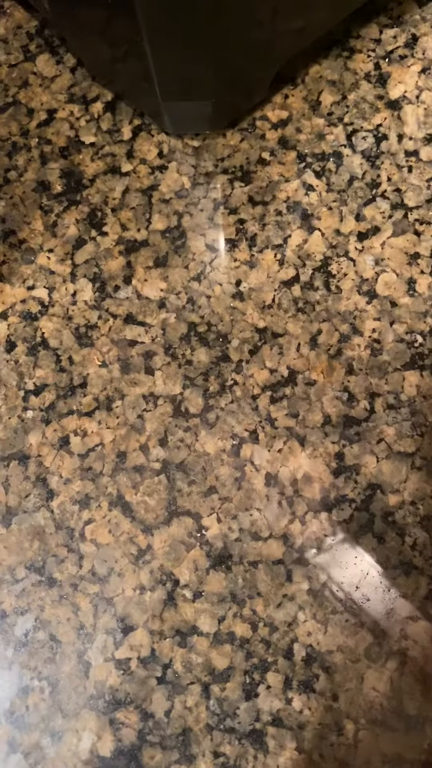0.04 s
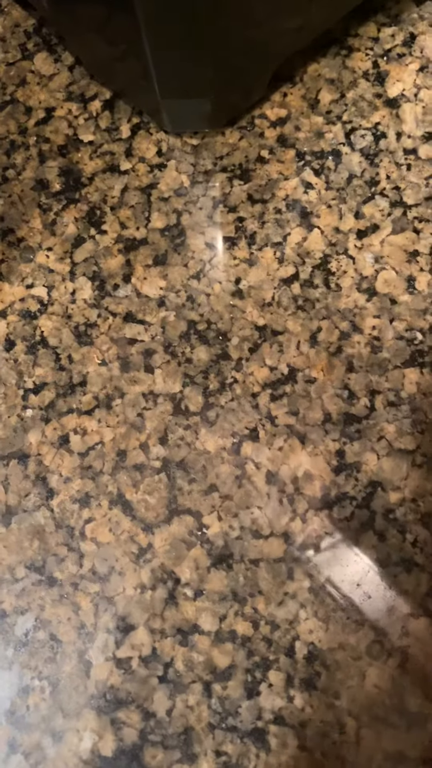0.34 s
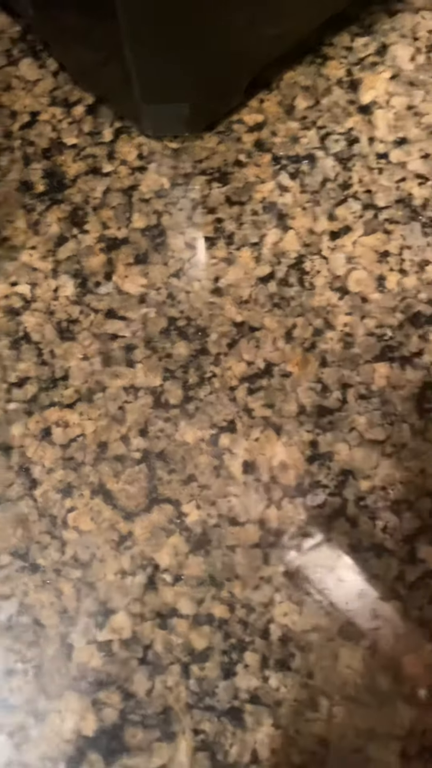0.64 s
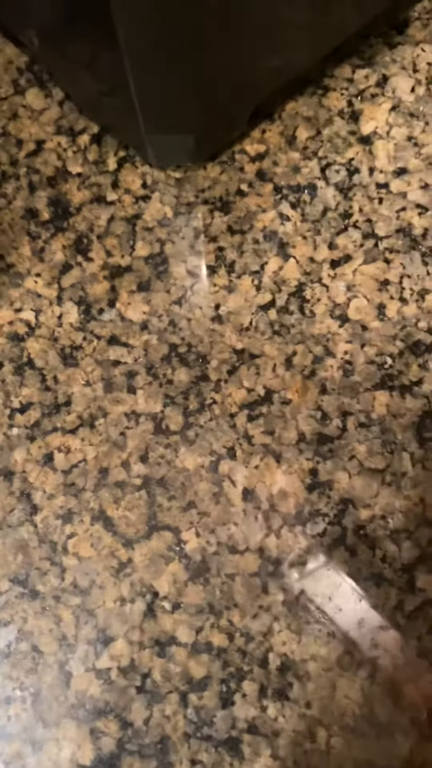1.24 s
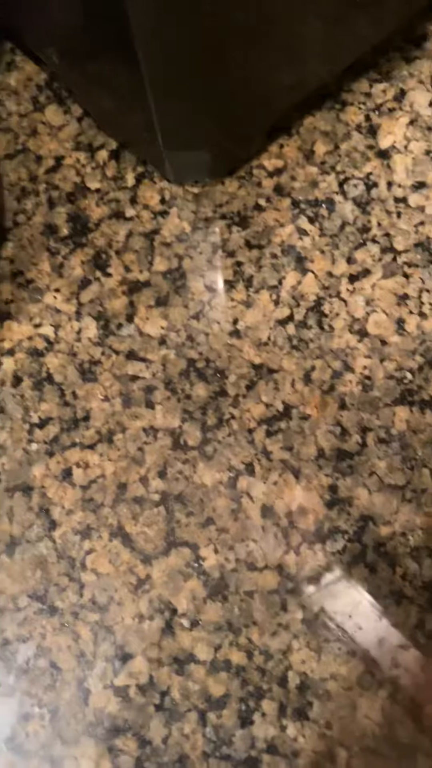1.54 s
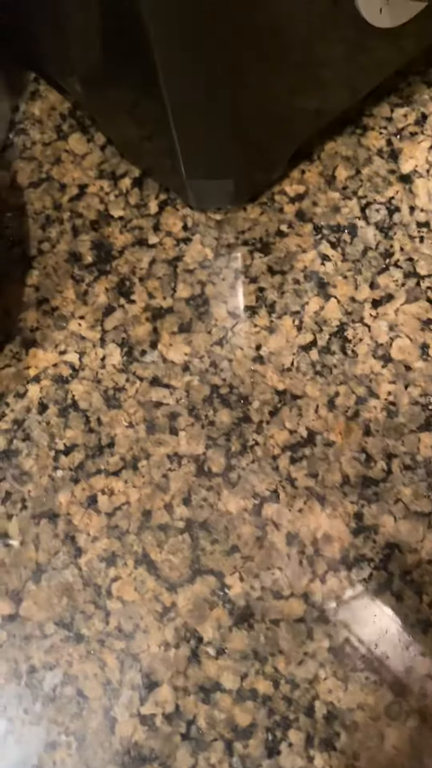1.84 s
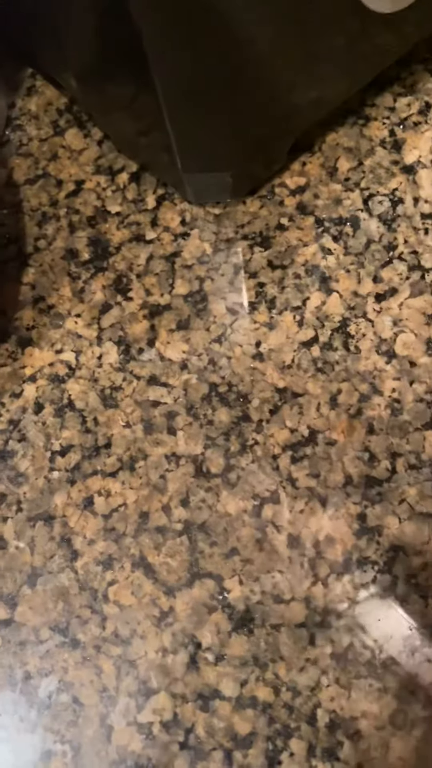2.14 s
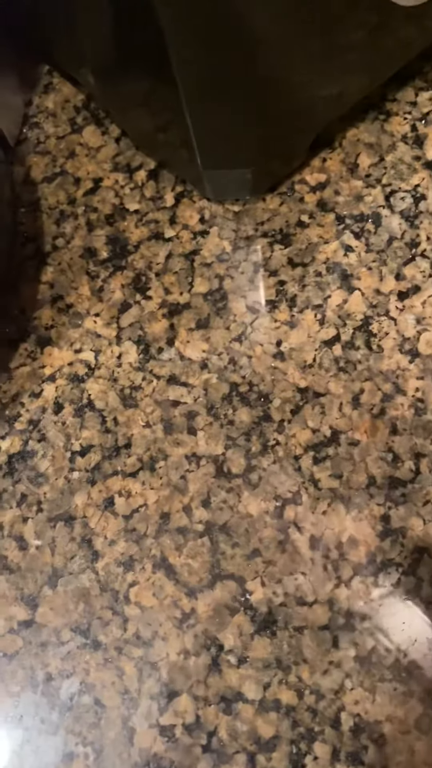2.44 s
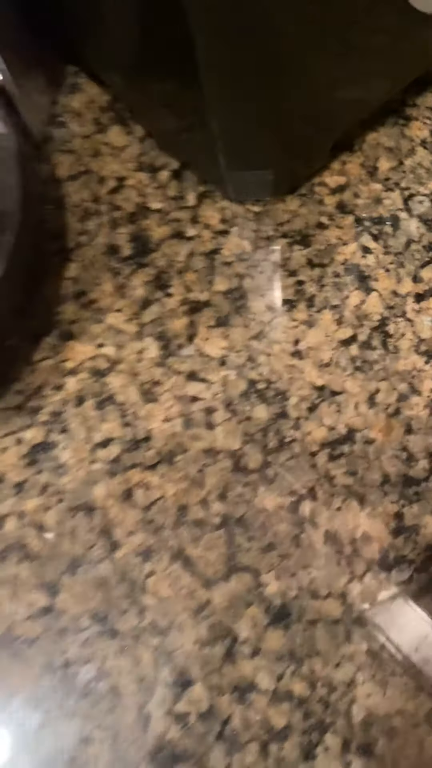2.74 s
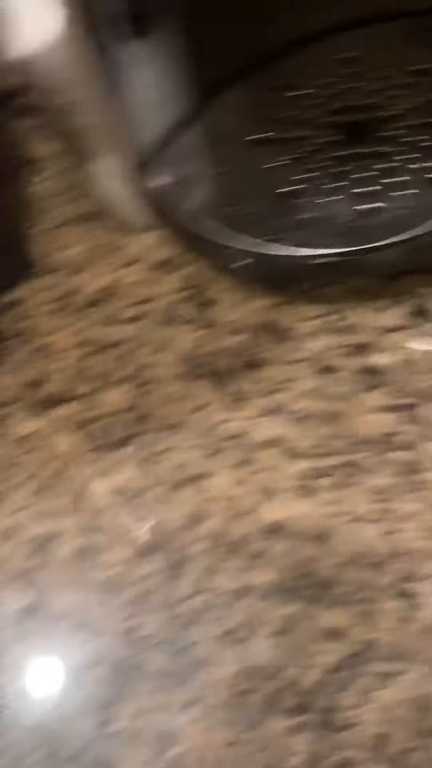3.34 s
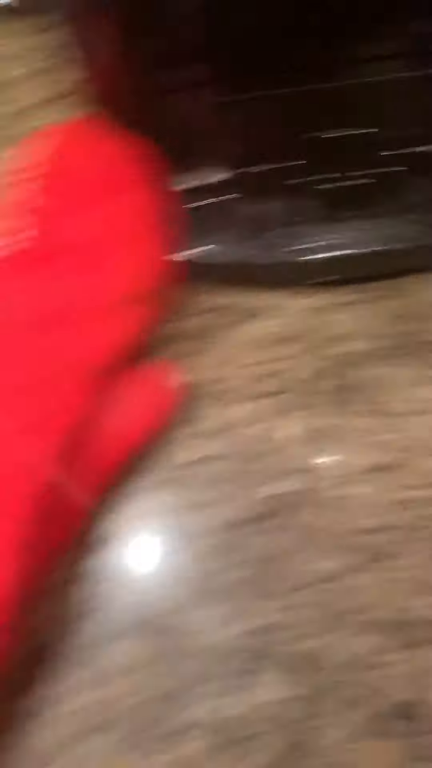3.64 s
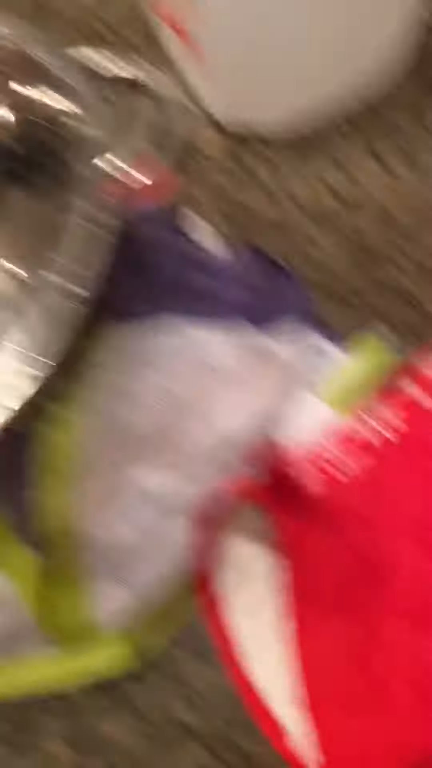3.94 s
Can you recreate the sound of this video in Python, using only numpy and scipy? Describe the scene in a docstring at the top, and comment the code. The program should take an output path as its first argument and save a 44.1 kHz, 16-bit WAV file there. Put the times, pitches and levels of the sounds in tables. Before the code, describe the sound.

A garbage disposal hums under a running kitchen tap, then winds down as the water continues.

```python
"""A garbage disposal hums and churns under a running kitchen tap, its rotor tones beating against
the mains hum. Switched off at 2.33 s, it shudders and coasts to a stop, its harmonics sliding down.
The water keeps hissing and spattering, ringing the sink and washing hollowly down the drain.
Near the end the spray swells and the sound grows brighter."""
import sys
import numpy as np
from scipy import signal
from scipy.fft import rfft, irfft
from scipy.io import wavfile
from scipy.ndimage import uniform_filter1d

SR = 44100
rng = np.random.default_rng(int(sys.argv[2]) if len(sys.argv) > 2 else 0)


def put_to_file(sound):
    """Save the sound as 16-bit audio at rate SR, in the file named by the first command-line argument."""
    columns = np.atleast_2d(sound).T  # one column per channel
    safe = np.clip(columns, -1, 1)
    whole_steps = np.round(safe * 32767)
    wavfile.write(sys.argv[1], SR, whole_steps.astype(np.int16))


N = 176400
T = np.arange(N) / SR
HZ = np.fft.rfftfreq(N, 1 / SR)

# hollow modes of the grinding chamber (pitch [Hz], width [Hz], relative level [dB])
CHAMBER_MODES = [(845, 140, -3.5), (1248, 66, -1), (1440, 190, 0)]
# ringing modes of the sink (pitch [Hz], width [Hz], relative level [dB])
SINK_MODES = [(2233, 160, -7.5), (2540, 50, -2), (2844, 61, -3), (3072, 35, -4.5), (3200, 30, 2),
              (4080, 360, -3), (5040, 51, 0), (5316, 85, 0.5), (6285, 190, 2)]
# swell shared by the spray and its drops (time [s], level [dB])
SPRAY_SWELL = [(0, -45.5), (1.4, -45), (1.55, -43.5), (1.9, -44.5), (2.35, -43), (3, -44.5), (3.8, -41),
               (4, -35.5)]


def amp(db):
    """Decibels to gain."""
    return 10 ** (np.asarray(db) / 20)


def unit(x):
    """Scales to rms 1."""
    return x / np.sqrt(np.mean(abs(x) ** 2) + 1e-20)


def by_hz(points, hz=HZ):
    """Reads a table along log frequency."""
    f, value = np.transpose(points)
    return np.interp(np.log(hz + 1), np.log(f + 1), value)


def level(points):
    """Gain envelope from (time [s], level [dB]) points."""
    return amp(np.interp(T, *np.transpose(points)))


def drift(rate_hz):
    """Slow random motion of rms 1."""
    return unit(irfft(rfft(rng.standard_normal(N)) / (1 + (HZ / rate_hz) ** 2), N))


def resonances(modes):
    """Gain curve with one peak for each mode."""
    return sum(amp(db) / (1 + (2 * (HZ - hz) / width) ** 2) for hz, width, db in modes)


def rush(gain, patchy_db, ripple_db=0., size=(7, 7)):
    """Two coloured noises with flickering patches (size: bands, frames) and the ripple of reflections."""
    bands = signal.stft(rng.standard_normal((2, N)), nperseg=256, noverlap=192)[2]
    patches = uniform_filter1d(rng.standard_normal(bands.shape[1:]), size[0], axis=0)
    patches = unit(uniform_filter1d(patches, size[1], axis=1))
    noise = signal.istft(bands * amp(patchy_db * patches), nperseg=256, noverlap=192)[1][:, :N]
    ripple = unit(uniform_filter1d(rng.standard_normal(len(HZ)), size=180))
    return unit(irfft(rfft(noise) * gain * amp(ripple_db * ripple), N))


def motor():
    """Rotor and mains tones beat while powered; then rotor harmonics slide down through the housing."""
    # running tones, each a sum of two frequencies (rotor multiple, mains multiple)
    tones = [(1, 0), (0, 1), (2, 0), (3, 0), (2, 1), (3, 1), (5, 0), (7, 0)]
    # strength of each tone with the rotor running free (level [dB])
    tone_levels = [-35.5, -32, -36.5, -47, -53.5, -55, -45, -61]
    # response of the housing (frequency [Hz], gain [dB])
    housing = [(30, -34), (55, -14), (85, -8), (135, 0), (190, -10), (245, -0.5), (315, -16.5), (400, -24)]
    loaded_hz, free_hz, mains_hz = 63.8, 65., 120.
    clear_s, off_s, coast_s, release_s = 1.06, 2.33, .77, .069
    load_db, coast_db, idle_hum_db = -4, -44, -56
    load = np.clip(1 - T / clear_s, 0, 1)  # the pitch creeps up as the load clears
    since_off = np.maximum(T - off_s, 0)
    rotor_hz = (free_hz + (loaded_hz - free_hz) * load) * np.clip(1 - since_off / coast_s, 0, 1)
    rotor_phase = 2 * np.pi * np.cumsum(rotor_hz) / SR
    mains_phase = 2 * np.pi * mains_hz * T
    power = np.exp(-since_off / release_s)
    hum = amp(idle_hum_db) * np.cos(mains_phase)
    for (k, m), db in zip(tones, tone_levels):
        waver = .045 * (k + m)
        gain = power * amp(db + load_db * load * np.sqrt(k)) * (1 + waver * drift(2.3))
        hum += gain * np.cos(k * rotor_phase + m * mains_phase + waver * drift(1.5))
    coasting = (1 - power) * np.minimum(rotor_hz / 6, 1)
    for k in range(1, 11):
        emphasis = np.exp(-((k - 6) / 3) ** 2 / 2)  # centred on the sixth harmonic
        gain = coasting * emphasis * amp(coast_db + by_hz(housing, k * rotor_hz))
        flutter = 1 + .28 * drift(14)
        hum += gain * flutter * np.cos(k * rotor_phase + 2 * np.pi * rng.random() + .28 * drift(10))
    return np.sqrt(2) * hum


def churn():
    """Water thrown about in the grinding chamber makes a low, surging rumble."""
    # colour of the rumble (frequency [Hz], relative level [dB])
    colour = [(28, -68), (60, -10), (100, -6.5), (145, 2.5), (175, -0.5), (215, -1.5), (255, 4.5),
              (295, -6), (330, -5.5), (365, -24.5), (500, -20), (900, -46)]
    # its surges (time [s], level [dB])
    surges = [(0, -40.5), (.28, -35), (.5, -43.5), (.8, -38), (2.2, -41.5), (2.32, -32.5), (2.42, -40),
              (2.7, -41.5), (2.9, -46.5), (3.06, -48), (3.14, -54), (4, -67)]
    return rush(amp(by_hz(colour)), patchy_db=.5) * level(surges) * amp(1.4 * drift(3.8))


def grind():
    """Water flung against the chamber wall makes it ring hollowly, fading as the rotor stops."""
    # swell of the ring (time [s], level [dB])
    swell = [(0, -58), (.23, -52), (.53, -57), (.65, -53), (1.07, -52.5), (1.3, -56.5), (1.68, -49.5),
             (1.85, -57), (2.35, -52.5), (2.85, -59.5), (3.1, -68)]
    return rush(resonances(CHAMBER_MODES), patchy_db=1.) * level(swell)


def tap_water(ripple_db=1.3):
    """The tap stream rings the basin, hisses as spray and washes down the drain pipe."""
    # water striking the basin (frequency [Hz], relative level [dB])
    basin_colour = [(100, 11), (350, 11), (600, 5.5), (1000, 2.5), (1850, 3.5), (2400, 5), (3500, -2.5),
                    (6500, -0.5), (16000, -1)]
    # swell of the basin (time [s], level [dB])
    basin_swell = [(0, -45.5), (.4, -45.5), (.57, -52.5), (.72, -47), (2.35, -47.5), (3, -51.5), (4, -52)]
    # hiss of the spray (frequency [Hz], relative level [dB])
    spray_colour = [(200, -3), (1800, -7.5), (3300, -0.5), (5700, 5), (7200, 5.5), (11000, 7.5), (13000, 3),
                    (15600, -4.5)]
    # hollow wash of the drain (frequency [Hz], relative level [dB])
    drain_colour = [(15, -42), (95, -21), (280, 6.5), (400, -10.5), (550, -4), (850, -0.5), (1300, -23),
                    (1850, -21), (5000, -2.5), (9000, -15.5)]
    # swell of the drain (time [s], level [dB])
    drain_swell = [(0, -58), (2, -55), (2.6, -53.5), (3.2, -53), (3.55, -47), (3.8, -48.5), (4, -50.5)]
    # modes of the drain pipe (pitch [Hz], width [Hz], relative level [dB])
    pipe_modes = [(488, 62, 0), (628.6, 56, 4.5), (1607, 104, -9.5), (2064, 93, -3)]
    basin = rush(amp(by_hz(basin_colour)), patchy_db=1., ripple_db=ripple_db)
    basin += amp(-1) * rush(resonances(SINK_MODES), patchy_db=2.5, size=(5, 14))
    spray = rush(amp(by_hz(spray_colour)), patchy_db=1.58, ripple_db=ripple_db)
    drain = rush(amp(by_hz(drain_colour)), patchy_db=1.5, ripple_db=ripple_db)
    drain += amp(-3) * rush(resonances(pipe_modes), patchy_db=3., size=(3, 30))
    basin *= level(basin_swell) * amp(1.9 * drift(25))
    spray *= level(SPRAY_SWELL) * amp(.91 * drift(15))
    return basin + spray + drain * level(drain_swell)


def splat(hz, width, rise_s, fade_s, size=4096):
    """One water impact: a noise burst round a pitch, its width a fraction of that pitch."""
    t, f = np.arange(size) / SR, np.fft.rfftfreq(size, 1 / SR)
    band = np.minimum(f / hz, 1) / (1 + ((f - hz) / (width * hz)) ** 2)
    noise = unit(irfft(rfft(rng.standard_normal((2, size))) * band))
    return noise * (1 - np.exp(-t / rise_s)) * np.exp(-t / fade_s)


def drops(per_s=380, pitches=24, spread_db=6):
    """Small drops land at random, a fine patter that follows the spray."""
    patter = np.zeros((2, N))
    for hz in np.geomspace(3000, 9000, pitches):
        lands = rng.random(N) < per_s / pitches / SR
        hits = lands * amp(spread_db * np.minimum(rng.exponential(1, N), 2.5))
        tick = splat(hz, width=.12, rise_s=.00015, fade_s=.0032)
        patter += signal.oaconvolve(hits[None], tick, axes=1)[:, :N]
    return unit(patter) * level(SPRAY_SWELL) * amp(-10)


def splashes(rise_s=.000966, direct_db=-11):
    """Larger splashes and rattles, heard partly direct and partly through the sink and chamber modes."""
    # single impacts (time [s], relative level [dB], pitch [Hz])
    impacts = [(.08, -43, 4100), (.155, -49, 1400), (.18, -43.5, 4450), (.247, -44.5, 2740),
               (.364, -41.5, 2590), (.645, -43, 2750), (.69, -43, 5300), (.732, -47, 1260),
               (.99, -43, 5180), (1.054, -42.5, 4160), (1.095, -49, 4100), (1.43, -45.5, 4050),
               (1.515, -48, 4100), (1.53, -43.5, 2450), (1.825, -47.5, 2700), (2.005, -43, 3190),
               (2.137, -43, 2530), (2.165, -42.5, 2850), (2.319, -38.5, 4920), (2.353, -41.5, 1890),
               (2.355, -50, 800), (2.553, -43, 2580), (2.956, -43, 2740), (3.138, -36, 9500),
               (3.32, -39.5, 4340), (3.46, -42.5, 5300), (3.621, -31, 9600), (3.674, -44, 3970),
               (3.754, -38, 4100), (3.804, -38, 4220), (3.827, -40.5, 2760), (3.883, -41, 2620),
               (3.926, -38, 4370), (3.969, -43, 2600)]
    hits = np.zeros((2, N))
    for s, db, hz in impacts:
        hit = amp(db + 6) * splat(hz, width=.16, rise_s=rise_s, fade_s=.013)
        start = round((s - rise_s) * SR)
        hits[:, start:start + hit.shape[1]] += hit[:, :N - start]
    modes = sum(amp(db) / (1 + 2j * (HZ - hz) / width) for hz, width, db in SINK_MODES + CHAMBER_MODES)
    ring = irfft(modes + amp(direct_db), N)[None, :4096]
    return signal.oaconvolve(hits, ring, axes=1)[:, :N]


def knocks():
    """Soft low knocks, each a few cycles of one pitch; the strongest is the shudder at switch-off."""
    # bell-shaped thuds (time [s], pitch [Hz], level [dB], half-length [s])
    thuds = [(.3, 159, -34, 0.0094), (.297, 255, -36, .012), (2.322, 247.6, -31, 0.036),
             (3.018, 57.4, -34, 0.014), (3.059, 220, -38, 0.0071), (3.54, 280, -47, 0.01),
             (3.969, 57.7, -37, 0.013)]
    return np.sqrt(2) * sum(amp(db) * np.exp(-((T - s) / half_s) ** 2) * np.cos(2 * np.pi * hz * (T - s))
                            for s, hz, db, half_s in thuds)


def whistle():
    """The flowing water whistles faintly: a breathy band of noise that creeps upward near the end."""
    # path of the whistle (time [s], pitch [Hz], level [dB])
    glide = [(2.5, 962, -59), (3.25, 1038, -53.5), (4, 1095, -59)]
    s, hz, db = np.transpose(glide)
    phase = 2 * np.pi * np.cumsum(np.interp(T, s, hz)) / SR
    breath = [unit((drift(50) + 1j * drift(58)) * np.exp(1j * phase)).real for _ in range(2)]
    return amp(np.interp(T, s, db)) * np.array(breath)


def widen(water):
    """Spreads the water left and right; in two treble bands the two sides stand in opposite phase."""
    # how much the two sides share (frequency [Hz], coherence [0-1])
    coherence = [(150, 1), (330, .98), (600, .35), (1300, .4), (1850, .85), (3000, .4), (4600, .55),
                 (6600, .86), (7000, .99), (8100, .99), (8500, .75), (10500, .97), (12000, .82),
                 (13000, .99), (15500, .75)]
    # phase offset between the sides (frequency [Hz], left minus right [rad])
    offset = [(2200, 0), (4200, 1), (5300, .35), (6900, 3.1), (8100, 3.2), (9800, 6.25), (11600, 6.5),
              (12500, 9.4), (14400, 9.45), (15400, 12.4)]
    # lean to the left (frequency [Hz], left minus right [dB])
    tilt = [(120, .5), (280, 2.9), (600, 2.4), (1200, .9), (3000, .1)]
    left, unrelated = rfft(water)
    same = by_hz(coherence)
    right = (same * left + np.sqrt(1 - same ** 2) * unrelated) * np.exp(-1j * by_hz(offset))
    lean = amp(by_hz(tilt) / 2)
    return irfft(np.array([left * lean, right / lean]), N)


def scene():
    """Motor and knocks sit in the middle; the water spreads around them."""
    water = churn() + grind() + tap_water() + drops() + splashes() + whistle()
    return motor() + knocks() + widen(water)


def record(dry):
    """A steep low-pass takes off the very top of the hiss."""
    lowpass = signal.firwin(511, 15950, window=("kaiser", 9), fs=SR)
    return signal.oaconvolve(dry, lowpass[None], "same")


dry = scene()
out = record(dry)
put_to_file(out)
```